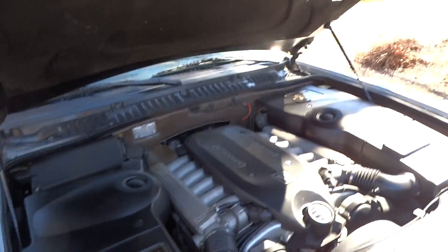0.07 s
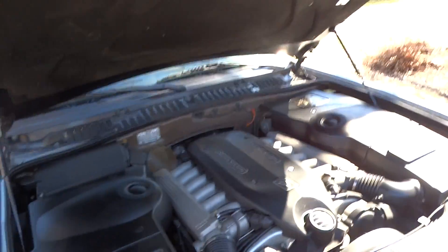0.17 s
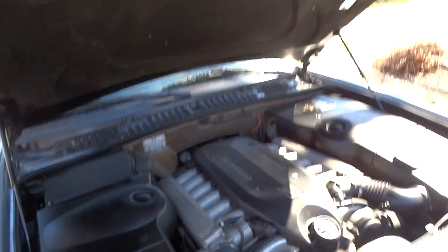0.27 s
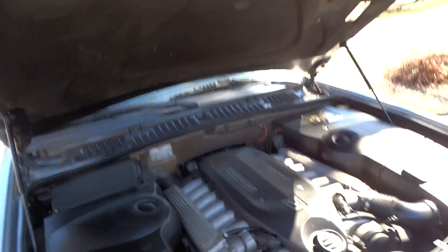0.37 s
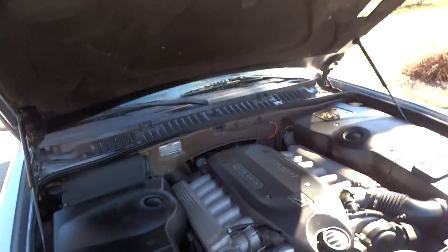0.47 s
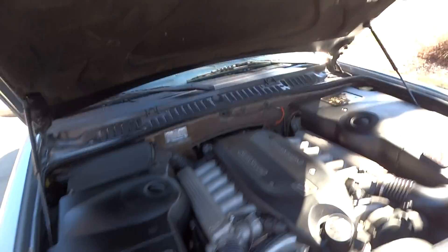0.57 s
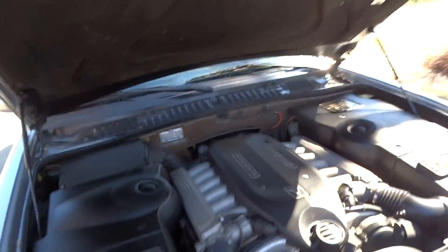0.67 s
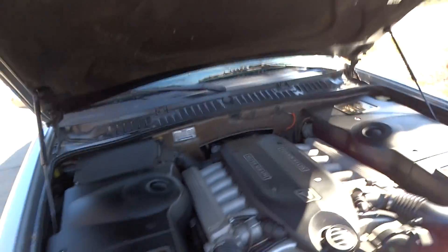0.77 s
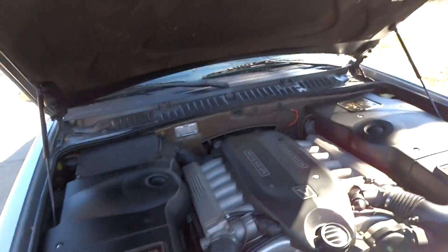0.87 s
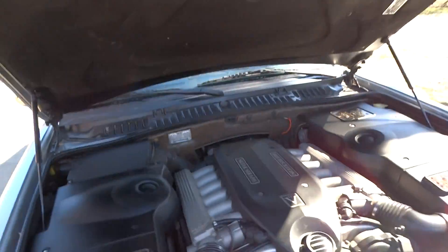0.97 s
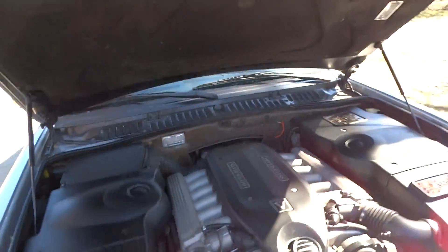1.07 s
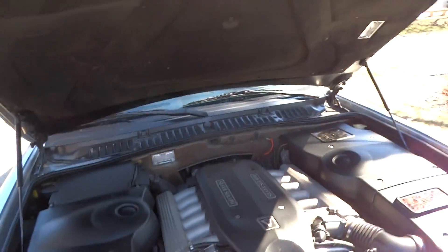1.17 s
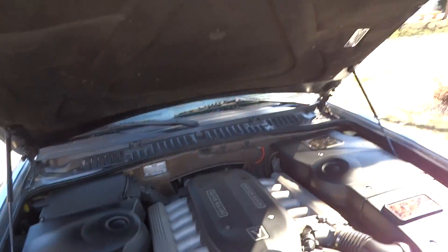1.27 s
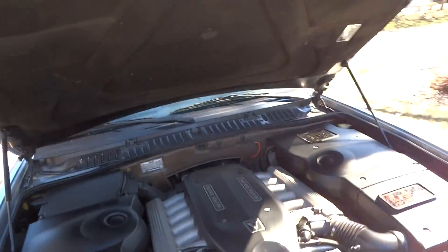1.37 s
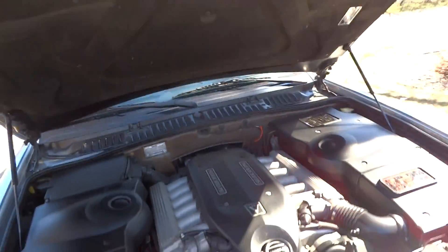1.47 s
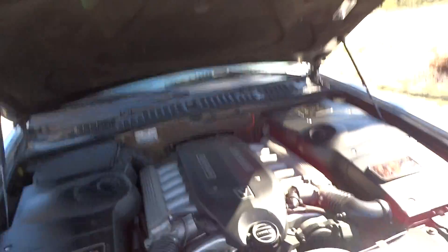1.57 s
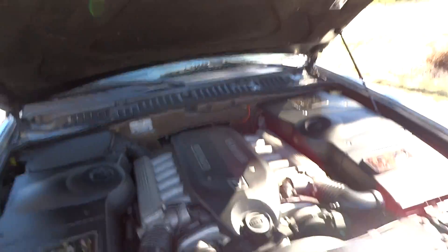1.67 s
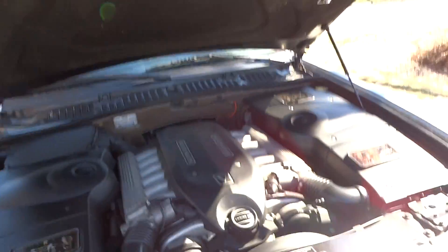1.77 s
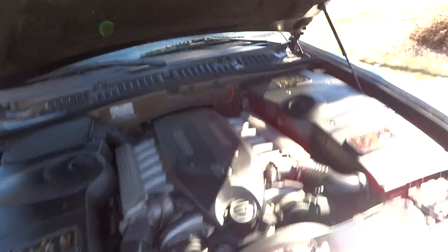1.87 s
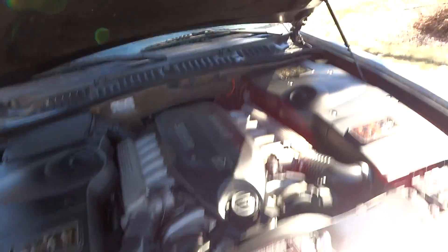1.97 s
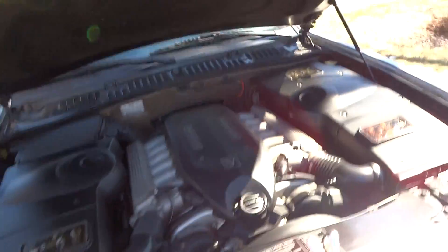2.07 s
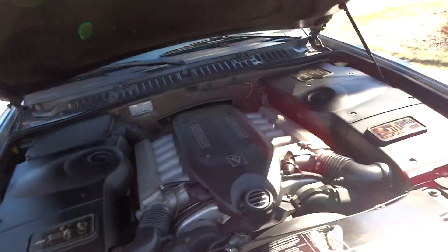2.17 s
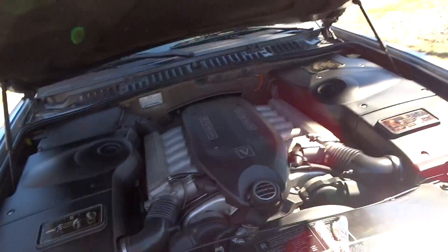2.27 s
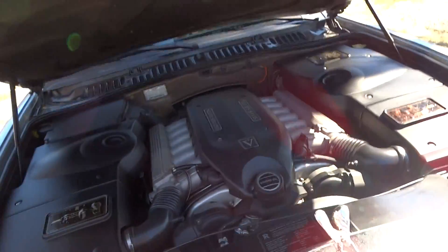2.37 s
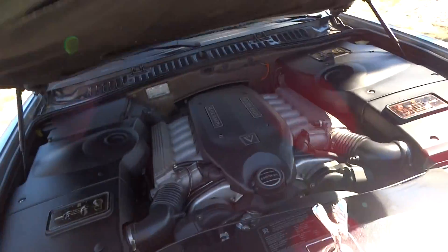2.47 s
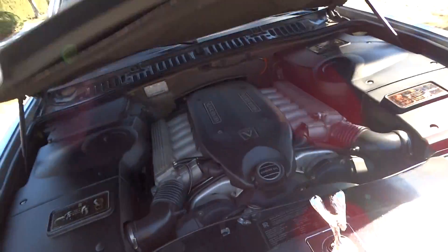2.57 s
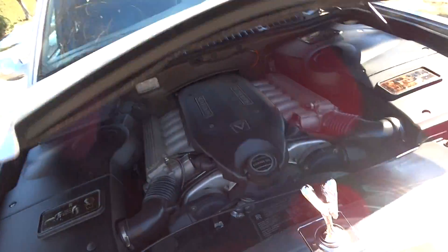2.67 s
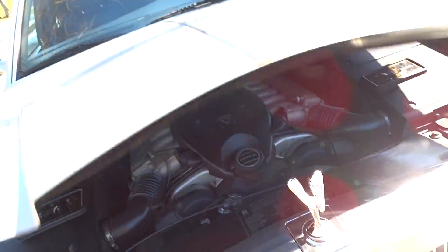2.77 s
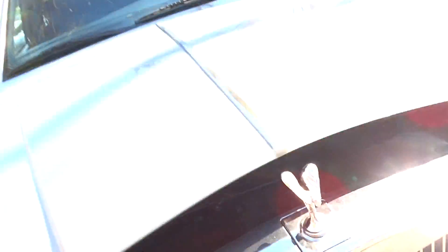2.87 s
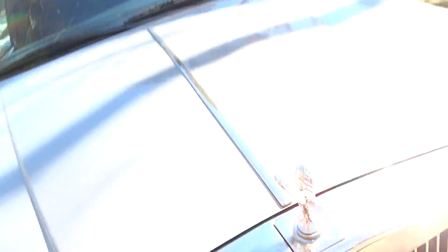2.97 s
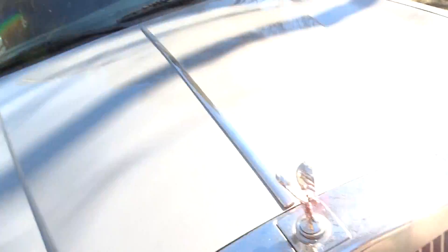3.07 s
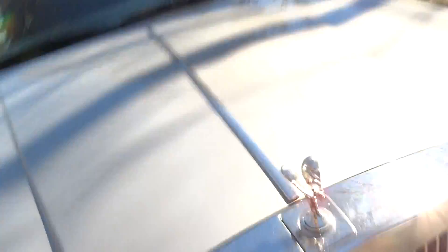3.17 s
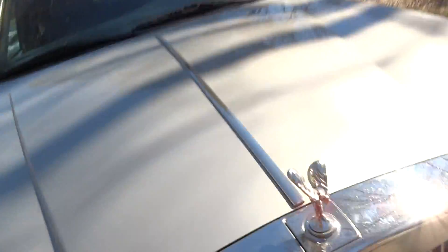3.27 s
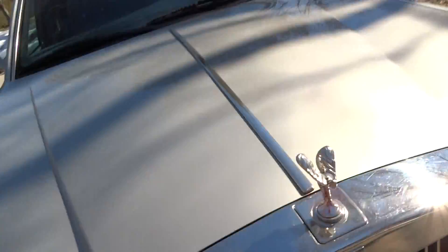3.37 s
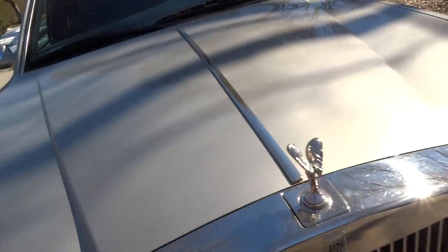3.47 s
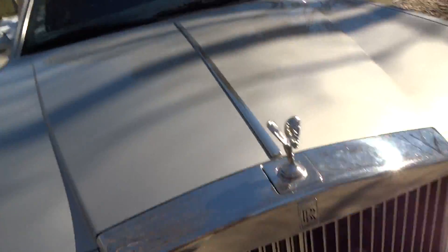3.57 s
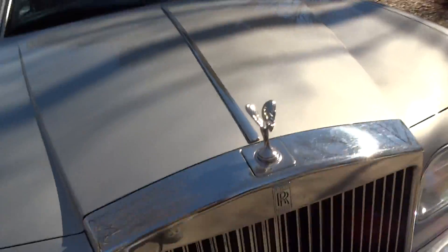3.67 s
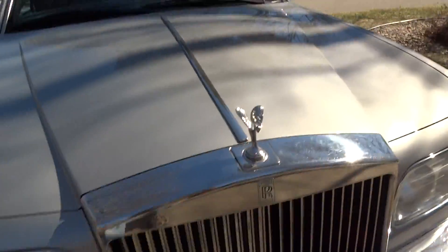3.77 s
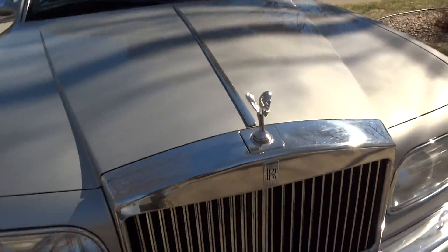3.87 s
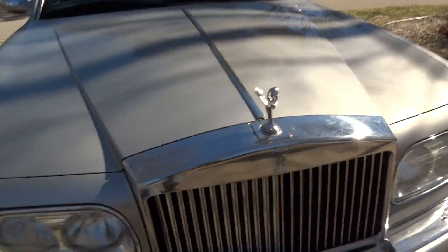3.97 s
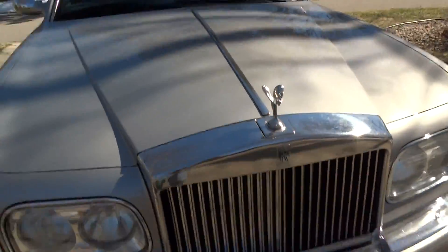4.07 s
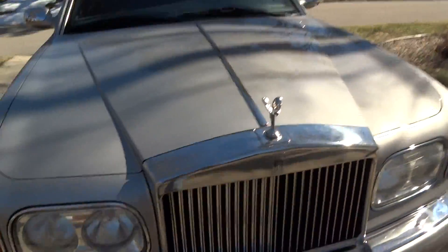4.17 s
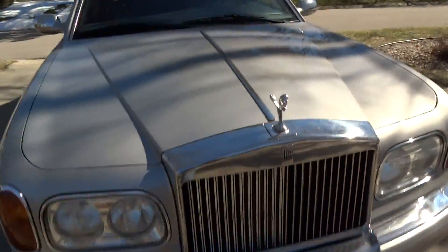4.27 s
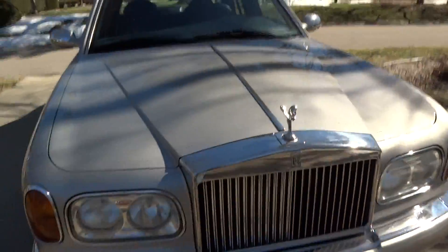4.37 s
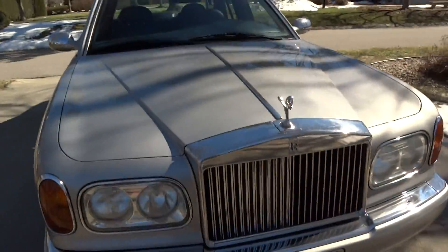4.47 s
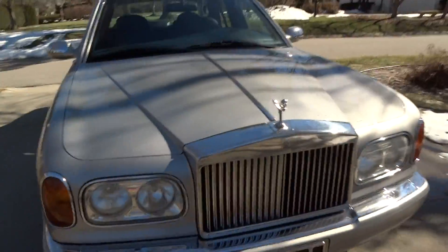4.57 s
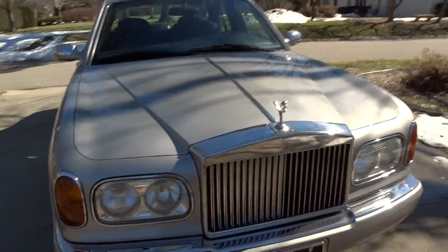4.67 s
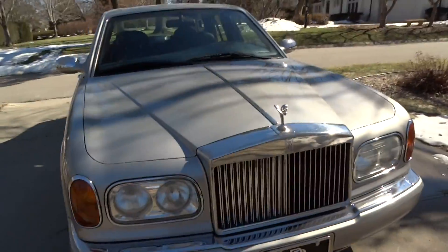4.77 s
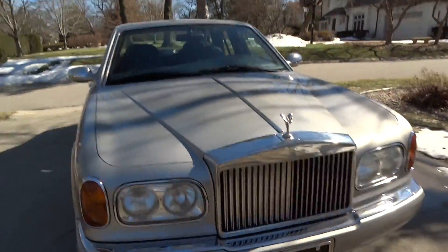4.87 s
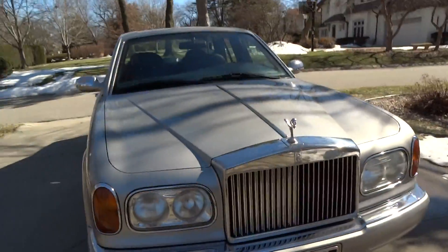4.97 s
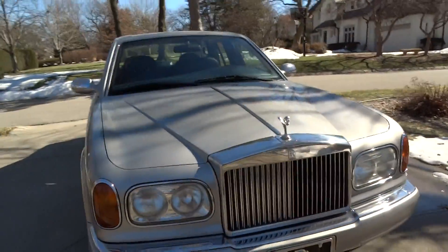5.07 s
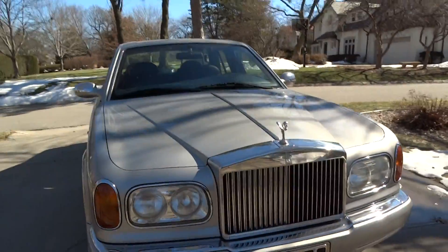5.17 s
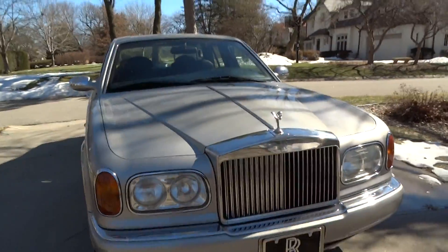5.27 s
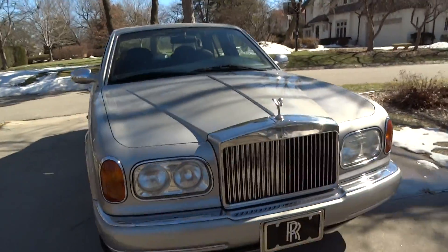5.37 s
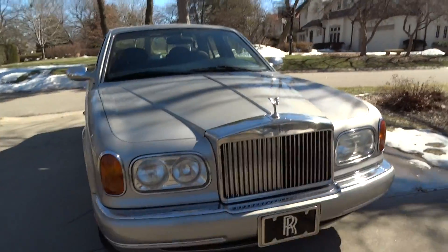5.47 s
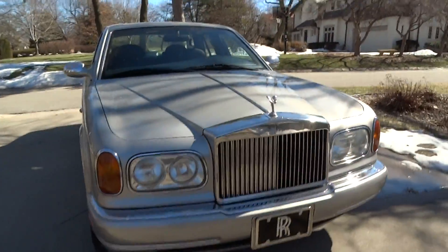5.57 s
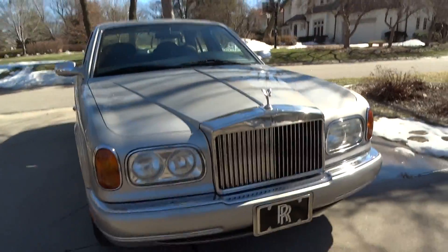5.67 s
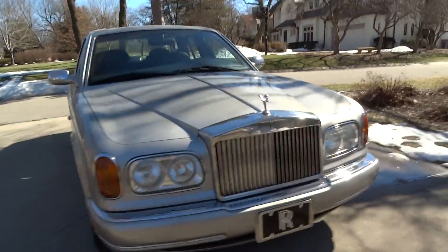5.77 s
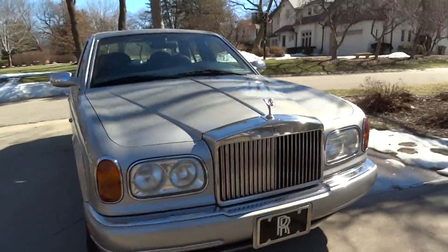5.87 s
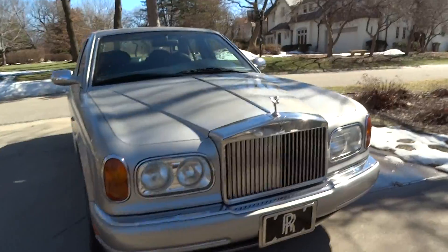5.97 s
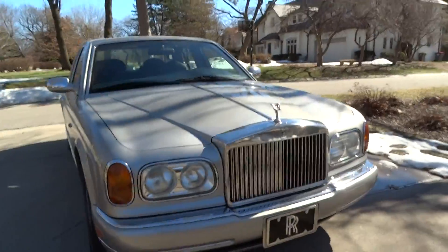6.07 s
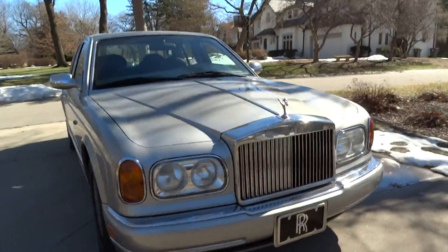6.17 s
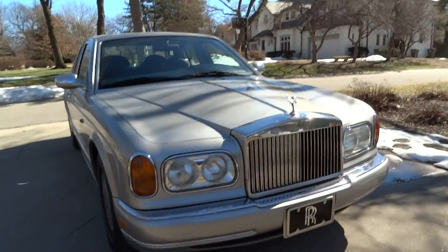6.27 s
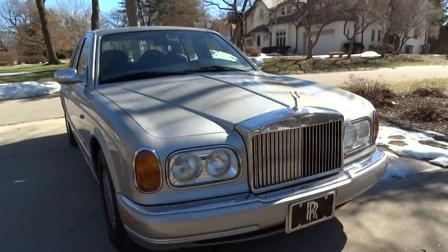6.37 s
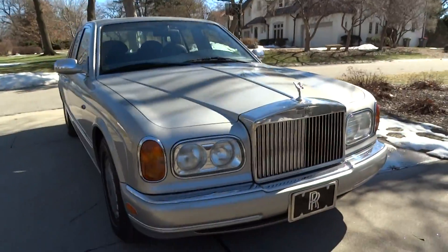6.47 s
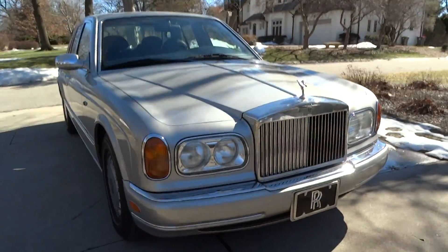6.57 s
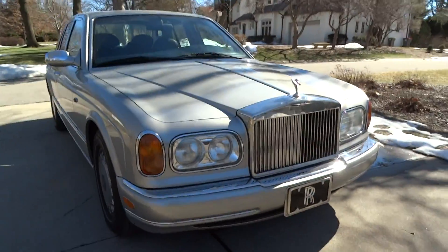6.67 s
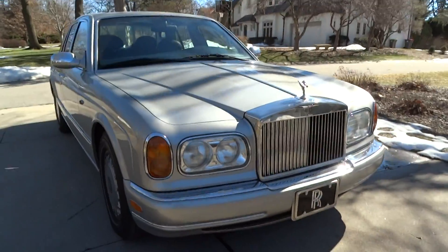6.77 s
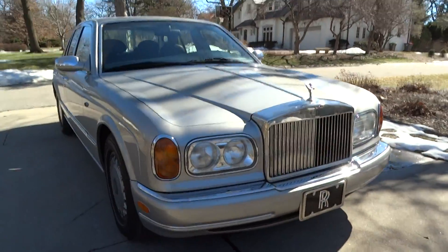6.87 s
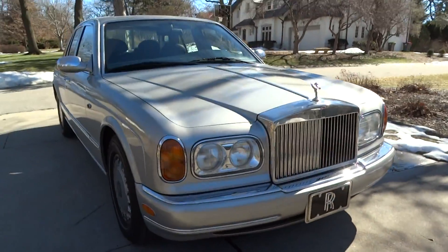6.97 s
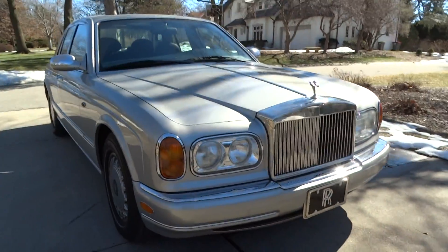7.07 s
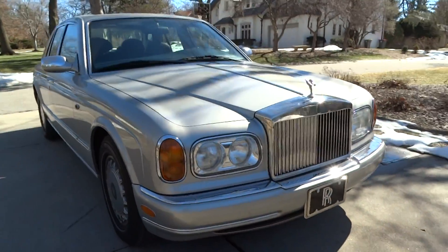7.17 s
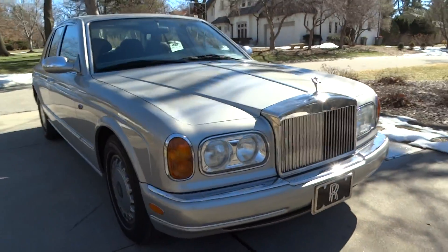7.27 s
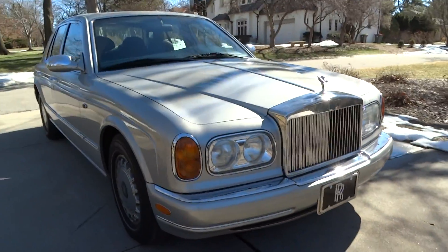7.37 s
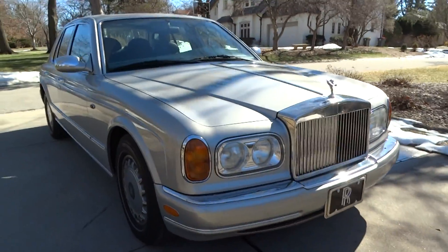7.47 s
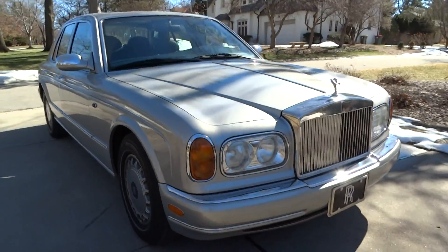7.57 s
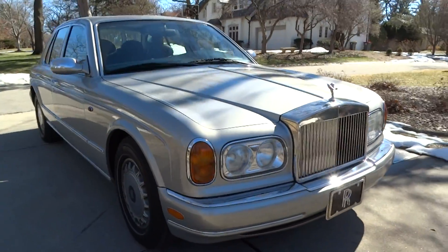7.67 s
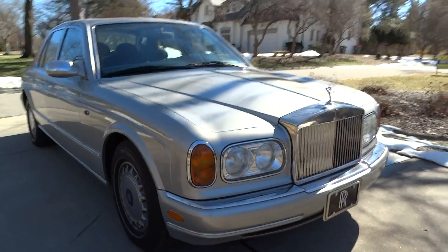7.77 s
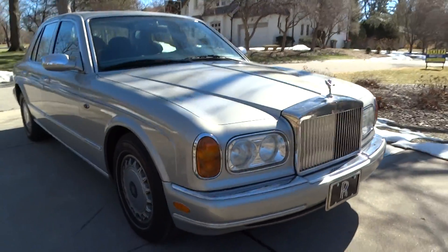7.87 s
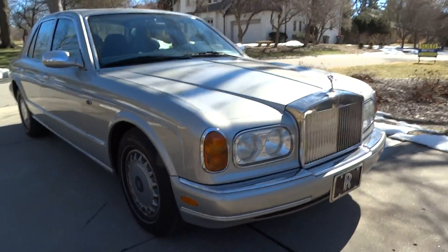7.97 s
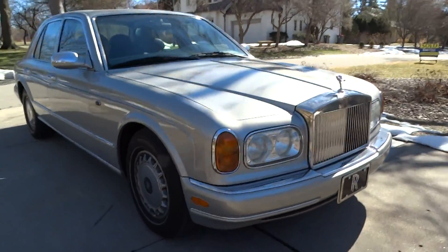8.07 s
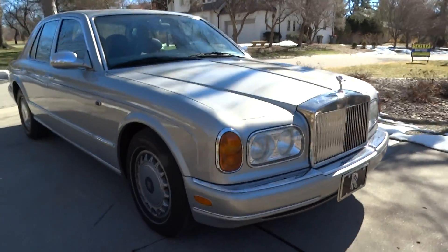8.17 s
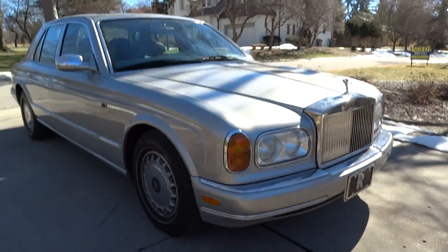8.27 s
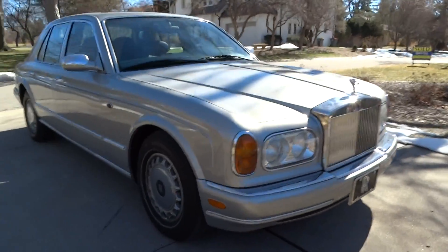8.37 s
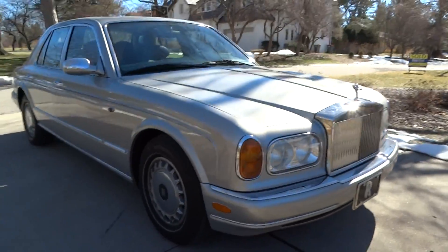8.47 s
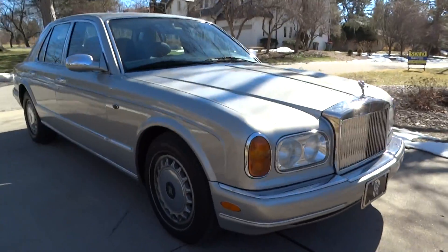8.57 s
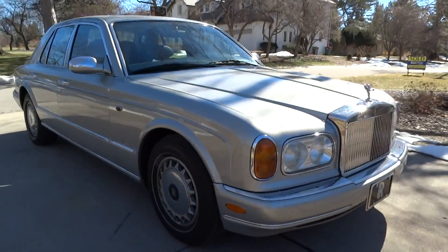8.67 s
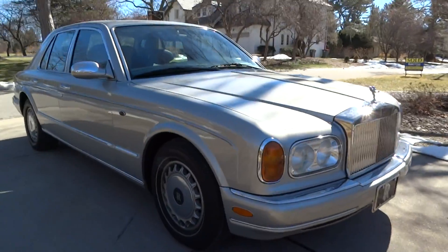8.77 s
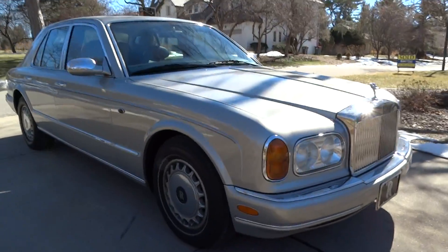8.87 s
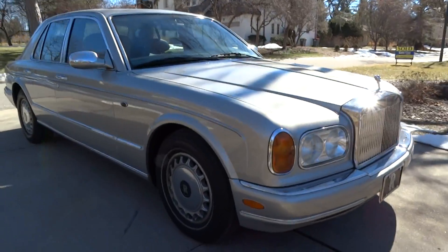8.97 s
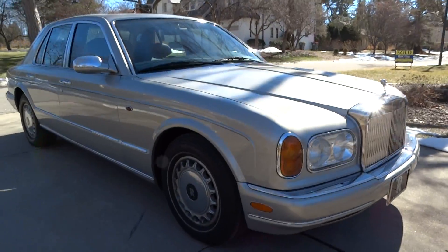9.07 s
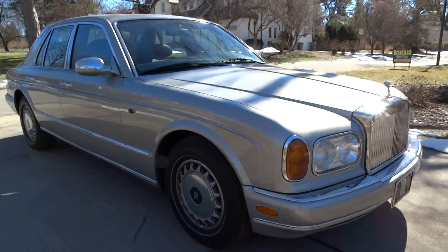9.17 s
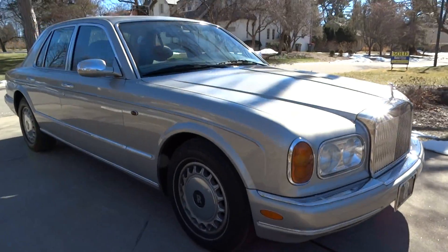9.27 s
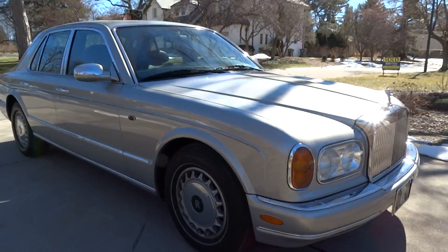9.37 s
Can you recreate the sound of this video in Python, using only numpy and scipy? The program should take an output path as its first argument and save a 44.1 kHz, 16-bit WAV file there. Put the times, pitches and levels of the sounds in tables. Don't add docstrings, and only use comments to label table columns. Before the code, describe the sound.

From 0 to 2.9 s a large engine idles steadily under an open bonnet, heard close outdoors: wide airy fan hiss, soft block roar, fast fine ticking, a hollow tone near 1.9 kHz and a faint whine around 930 Hz. Tiny footfalls and low wind puffs are barely noticeable. At 2.97 s the latch cracks and at 2.99 s the panel slams, very loud, with bright steel rattle, clang and a short mid-low boom, rubbery thumps and small clicks fading by about 3.5 s. The idle returns quieter, duller, with less ticking. From 3.7 to 5.6 s thin ice snaps in sparse, dry, bright clicks, the sharpest at 5.32 s. From 6.7 to 7.4 s a shoe drags and twists on grit, rasping and crunching. Small grit ticks follow near 8 s; a very faint distant vehicle hums through the end as the idle continues.

```python
import sys
import numpy as np
from scipy import signal
from scipy.fft import rfft, irfft, next_fast_len
from scipy.io import wavfile
from scipy.ndimage import uniform_filter1d, map_coordinates

SR = 44100
rng = np.random.default_rng(int(sys.argv[2]) if len(sys.argv) > 2 else 0)


def level_to_linear(level):
    exponent = np.asarray(level, float) / 20
    return 10 ** exponent


def transcribe(signal):
    frames = np.atleast_2d(signal).T
    limited = np.clip(frames, -1, 1)
    pcm = np.round(limited * 32767).astype(np.int16)
    wavfile.write(sys.argv[1], SR, pcm)


N = 414969

# time_s, pitch_hz, level_db
FAR_NOTE = [(7.9, 97.6, -91), (8.252, 105.8, -71), (8.34, 110, -76), (8.474, 113.6, -66), (8.534, 113, -75),
            (9.024, 116.1, -67), (9.244, 118.2, -76), (9.41, 116, -66)]
# peak_s, level_db
GUSTS = [(.64, -59), (.78, -53.5), (2.02, -57), (2.76, -62), (3.01, -47), (3.21, -52), (3.88, -64),
         (4.05, -68), (4.92, -62), (5.5, -71), (9.018, -63)]
# time_s, whine_hz, alternator_db
IDLE = [(0, 911, -56), (.5, 935, -64), (2.0, 925, -60), (2.36, 936, -48), (2.83, 954.6, -45),
        (2.95, 958, -49.5), (3.27, 942, -53.5), (3.58, 946, -50.5), (3.7, 927, -61), (4.142, 925, -52),
        (4.64, 930, -50.5), (4.78, 923, -70), (5.76, 924, -61), (6.7, 925, -69), (7.1, 918, -58.5),
        (8.3, 927, -58.5), (8.8, 952, -56.5), (9.41, 934, -59.5)]
# time_s, nearness_db
NEARNESS = [(0, -.5), (.84, 0), (1.5, 0), (2.1, .5), (3.6, 0), (3.93, 1), (4.32, 0), (4.51, 0), (5.1, -1),
            (6.2, -2), (7.6, -1.5), (8.1, -2), (9.0, -1.5), (9.41, -2)]
# open_db, shut_db, db_per_db_of_nearness, lost_to_bang_db
ENGINE_LAYERS = [
    (-47, -51.5, 1.93, -1.5),
    (-41, -46, 1.13, 3.5),
    (-49.5, -66, 0.5, 19),
]
# peak_s, level_db
HOLLOW_SWELLS = [(.0, -50), (.45, -47), (.9, -44.5), (2.1, -47.5), (2.7, -47), (4.5, -49), (5.4, -51),
                 (5.9, -49.5), (6.4, -51), (7.1, -49.5), (8.4, -53.5), (9.0, -56.5)]

# freq_hz, density_db
AIR_COLOUR = [(12, -55), (20, -34), (50, -16), (90, -6.5), (150, -7), (230, -6), (330, -12), (600, -120)]
OPEN_BLOCK_COLOUR = [(71, -52), (120, -22.5), (297, -8.5), (381, -2.5), (413, -7), (518, -3), (586, -9.5),
                     (711, -8.5), (787, -0.5), (1040, -6), (1330, -1), (1540, -9.5), (1800, -4),
                     (2340, -12.5), (3960, -120)]
SHUT_BLOCK_COLOUR = [(88, -38), (150, -18.5), (225, -19), (247, -18.5), (274, -9), (334, -13.5), (356, -14),
                     (386, -13), (562, -11.5), (767, -8), (869, -7), (935, -4.5), (1020, -8.5),
                     (1800, -13.5), (2340, -30), (3960, -120)]
FAN_COLOUR = [(760, -65), (1300, -4.5), (1860, -1.5), (2150, -0.5), (2470, -1.5), (2830, -4.5),
              (3380, -0.5), (3680, -1), (5150, 0), (6420, -5.5), (7830, -2.5), (9070, -10), (12600, -36),
              (15000, -55), (16000, -31.5)]
INJECTOR_COLOUR = [(1760, -7), (3000, -10), (3450, 0), (4030, -9), (5000, -4), (6570, -6.5), (8640, 1),
                   (9270, -2.5), (9940, -11), (11500, -5.5), (12500, -14), (14700, -13), (16000, -16)]
GRIT_COLOUR = [(350, -53), (600, -27), (1050, -4.5), (1140, -8), (1410, -5.5), (1980, -6.5), (2610, -3),
               (5050, -1), (6200, -11), (8620, -11.5), (16000, -41.5)]
RATTLE_COLOUR = [(1500, -29), (2500, -20), (3200, -3.5), (4400, -0.5), (6000, -2), (7700, -7), (8900, -6.5),
                 (10300, -20.5), (15100, -29), (16000, -36)]
CLANG_COLOUR = [(710, -34), (1200, -7.5), (1600, -7.5), (1750, -6), (2320, -10.5), (2900, -10.5),
                (3770, -10.5), (6380, -120)]
BOOM_COLOUR = [(24, -73), (40, -53), (162, -21.5), (242, -9), (298, -2), (341, -7), (487, -2), (618, -7.5),
               (738, -5), (832, -4.5), (937, -7.5), (1400, -15), (1820, -43), (3080, -120)]

# start_s, peak_db, pitch_hz
STEPS = [(0.759, -46, 380), (2.009, -44, 320), (3.859, -53, 195), (3.865, -43, 960), (4.06, -46, 600),
         (4.352, -38, 930), (4.43, -46.5, 562), (4.51, -50, 520), (7.073, -42, 1479), (9.008, -45.5, 312)]
# start_s, length_s, level_db, rasp_hz, brightness_db
SCUFFS = [(3.925, 0.054, -41, 4300, -15), (6.982, 0.047, -43.5, 4300, -4), (7.045, 0.042, -40.5, 5200, 0.5),
          (7.1, 0.078, -49, 4900, -2), (7.166, 0.032, -44, 4850, 5), (7.218, 0.19, -50.5, 5490, 2.5),
          (8.002, .13, -57, 4680, 5.5)]
# start_s, peak_db, pitch_hz
STONES = [(3.9303, -26, 4300), (3.939, -30, 4300), (6.7028, -35, 3680), (6.7178, -34, 5010),
          (6.7238, -34, 5060), (6.7485, -30, 4060), (6.761, -34, 3800), (6.788, -27, 3400),
          (6.8024, -31, 3320), (6.823, -30, 3300), (6.8438, -32, 3200), (6.8607, -25, 5150),
          (6.868, -29, 5100), (6.8925, -25, 3600), (6.9123, -24, 5100), (6.92, -28, 8800),
          (6.931, -27, 4000), (6.936, -21, 3300), (6.9435, -23, 5160), (6.9513, -30, 4390),
          (6.957, -31, 7600), (6.962, -27, 9000), (7.014, -33, 8590), (7.042, -28.5, 3700),
          (7.0495, -29, 8870), (7.056, -31, 4600), (7.0682, -23, 5150), (7.076, -28, 5200),
          (7.098, -34, 8500), (7.1265, -36, 3000), (7.134, -33, 8620), (7.164, -34, 5000),
          (7.172, -36, 9500), (7.1818, -30, 4500), (7.187, -27, 5000), (7.196, -26, 8300),
          (7.214, -34, 4000), (7.2513, -31.5, 5100), (7.272, -39, 9450), (7.333, -35, 5000),
          (7.3765, -30, 4850), (7.4182, -27, 4950), (7.429, -30, 5300), (8.006, -37, 5060),
          (8.0897, -36, 7850)]
# time_s, pressure_db, rasp_hz
DRAG = [(6.7, -59, 4500), (6.72, -43.5, 4320), (6.752, -36, 3920), (6.772, -35.5, 3700), (6.79, -33, 3450),
        (6.815, -36, 3285), (6.845, -35, 3250), (6.862, -41, 3290), (6.886, -51, 3400)]
# time_s, pressure_db, rasp_hz
TWIST = [(6.889, -48, 4000), (6.894, -39.5, 4200), (6.914, -34, 4600), (6.927, -39, 4000),
         (6.94, -37, 4200), (6.952, -34, 4600), (6.965, -31.5, 6000), (6.976, -43, 5800), (6.99, -52, 5600)]
# rasp_db, grit_db, bright_grit_db, sole_whistle_db
STROKE_MIXES = [
    (1, -5.5, -15, -9),
    (-5, 0, -4.5, -10),
]

# start_s, peak_db, snap_hz, low_shard_db, knock_db
DEEP_SNAPS = [(3.664, -36, 3600, -1, -0.5), (4.324, -27, 4850, -3, -26), (4.8052, -19.5, 4150, -17, -20),
              (4.9593, -26.5, 3900, -0.5, -7.5), (5.3223, -6, 4180, -22, -26.5)]
# start_s, peak_db, snap_hz, low_shard_db, knock_db
SHALLOW_SNAPS = [(3.7662, -21, 3860, -18, -22), (3.7678, -25, 5000, -12, -22),
                 (4.352, -30.5, 4250, -16, -4), (4.731, -24.5, 4550, -13, -11), (4.9482, -33, 3200, -6, -9),
                 (4.9995, -29.5, 4570, -5, -10), (5.627, -18.5, 4520, -14, -21.5)]
# pitch_ratio, level_db
SHARD_OVERTONES = [(1.9, -22), (3.0, -17)]
# centre_hz, width_hz, level_db
CRUST_MODES = [(2270, 1500, 0.5), (3700, 1700, 4), (8300, 1800, -1), (13000, 1800, -11)]

# start_s, peak_db, ring_hz
LATCH = [(2.969, -2, 7900), (2.983, -15, 4500), (2.9941, -5, 5700), (3.0024, -15, 3900), (3.0123, -9, 6500),
         (3.022, -11, 4630), (3.0594, -15, 4270), (3.1227, -21, 3330), (3.172, -29, 7340),
         (3.195, -33, 3420), (3.2228, -29, 3360), (3.2424, -35, 3390), (3.286, -35, 4500)]
# start_s, peak_db, pitch_hz
RUBBER_STOPS = [(2.969, -23, 1700), (2.976, -23, 330), (2.98, -25, 1320), (2.983, -25, 754),
                (3.019, -12, 700), (3.024, -14.5, 398), (3.026, -15, 1214), (3.03, -17.5, 990),
                (3.042, -14.5, 770), (3.05, -21, 302), (3.056, -15.5, 695), (3.064, -13, 498),
                (3.072, -16, 790), (3.085, -16, 640.5), (3.09, -19, 520), (3.118, -23, 380),
                (3.12, -25, 830), (3.215, -35, 800)]
# pitch_hz, level_db, t60_s
PANEL_MODES = [(225, -31.5, 0.67), (325, -40, 2.0), (424, -24.5, 0.54), (520, -28, 0.39), (754, -31, 0.49),
               (860, -46, 1.4), (1090, -30, .28), (1227, -29.5, 0.62), (1300, -37, 1.0), (1960, -41, 0.67),
               (3100, -46, .7), (3400, -31, 0.6), (3898, -36, 0.56), (5240, -40, 0.33)]
# strike_db, blow_db, attack_s, lose_20_db_s, tail_db, tail_t60_s
SHAKES = [
    (-15.5, -14, 0.0021, 0.1445, -38, 0.49),
    (-19.5, -19, 0.013, 0.193, -43, 0.48),
    (-28, -20, 0.0052, 0.17, -28.5, 0.86),
]
# freq_hz, side_db
PORT_SIDE = [(40, -16), (250, -15), (800, -11.5), (1400, -12.5), (2400, -17), (3600, -22.5), (4500, -31),
             (7400, -33.5), (8400, -16), (10800, -8), (13000, -16), (15500, -29)]

STRIKE_S, BLOW_S = 2.968, 2.993


def unit(x):
    return x / np.sqrt(np.mean(x ** 2) + 1e-20)


def along(points, hz):
    f, v = np.transpose(points)
    return np.interp(np.log(hz + 1), np.log(f + 1), v)


def curves(rows, outside=None):
    s, *columns = np.transpose(rows)
    t = np.arange(N) / SR
    return [np.interp(t, s, column, outside, outside) for column in columns]


def peaks(rows, rise, fall):
    t = np.arange(N) / SR
    return np.max([db - np.maximum(rise * (s - t), fall * (t - s)) for s, db in rows], axis=0)


def wobble(rate):
    knots = rng.standard_normal(int(N * rate / SR) + 4)
    return map_coordinates(knots, [np.arange(N) * rate / SR])


def filtered(x, response):
    m = next_fast_len(N + SR // 2)
    return irfft(rfft(x, m) * response(np.fft.rfftfreq(m, 1 / SR)), m)[..., :N]


def narrow(width_hz):
    return unit(filtered(rng.standard_normal(N), lambda hz: 1 / (1 + (hz / width_hz) ** 4)))


def rush(colour, patchy_db):
    z = signal.stft(rng.standard_normal(N + 512), nperseg=512)[2]
    field = uniform_filter1d(rng.standard_normal(z.shape), size=5, axis=0)
    field = uniform_filter1d(field, size=16, axis=1)
    x = signal.istft(z * level_to_linear(patchy_db * unit(field)), nperseg=512)[1][:N]
    lowest_hz = colour[0][0]
    return unit(filtered(x, lambda hz: level_to_linear(along(colour, hz)) * np.minimum(hz / lowest_hz, 1) ** 4))


def tone(hz, phase=0):
    return np.sin(2 * np.pi * np.cumsum(np.broadcast_to(hz, N)) / SR + phase)


def decay(db, t60, length=SR // 20):
    return level_to_linear(db - 60 * np.arange(length) / SR / t60)


def ring(hz, t60, attack, length=SR // 8):
    t = np.arange(length) / SR
    return np.sin(2 * np.pi * hz * t) * decay(0, t60, length) * (1 - np.exp(-t / attack))


def add(track, s, sound):
    part = track[round(s * SR):][:len(sound)]
    part += sound[:len(part)]


def surroundings():
    calm_db = -75
    air_db = np.maximum(peaks(GUSTS, rise=198, fall=140.5), calm_db)
    air = level_to_linear(air_db) * unit(level_to_linear(3.2 * wobble(11)) * rush(AIR_COLOUR, patchy_db=0.0))
    far_db = curves(FAR_NOTE, -120)[1] + 2.5 + 1.54 * wobble(8)
    return air + level_to_linear(far_db) * tone(curves(FAR_NOTE)[0])


def bay_hollow():
    t = np.arange(N) / SR
    open_hz, grille_hz, sink_hz_per_s = 1854, 2182, 31
    hz = np.where(t > BLOW_S, grille_hz - sink_hz_per_s * np.maximum(t - 5.5, 0), open_hz)
    level_db = peaks(HOLLOW_SWELLS, rise=19, fall=19) - 1.5
    return level_to_linear(level_db) * (.45 + .85 * narrow(95)) * tone(hz)


def belt_whines(turns, alternator_db):
    t = np.arange(N) / SR
    pump_db = -68.5 + 11 * np.exp(-((t - 3.75) / 1.1) ** 4)
    out = np.zeros(N)
    for cycles_per_firing, db in ((15, alternator_db), (18, pump_db)):
        phase = 2 * np.pi * cycles_per_firing * turns + 0.4 * wobble(25)
        out += level_to_linear(db + 1 + 1.5 * wobble(16)) * np.sin(phase)
    pulley_db = np.where(t > 6.8, -60.5, -69.5)
    out += level_to_linear(pulley_db) * (.6 + .75 * narrow(35)) * tone(778)
    lean_in = np.exp(-((t - 1.95) / .55) ** 2)
    return out + level_to_linear(-62) * lean_in * tone(520, .6 * wobble(20))


def injectors(turns):
    size_db = 3.0 * rng.standard_normal(int(N / SR * 70))[turns.astype(int)]
    puff = 0.77 + level_to_linear(size_db) * (.5 - .5 * np.cos(2 * np.pi * turns)) ** 0.96
    return unit(puff * rush(INJECTOR_COLOUR, patchy_db=1.8))


def engine():
    t = np.arange(N) / SR
    shut_s, fall_s, deaf_s, recover_s = 2.97, .17, 0.29, 0.26
    cover = np.clip((t - shut_s) / fall_s + 1, 0, 1)
    deaf = (t > BLOW_S) * np.exp(-np.maximum(t - BLOW_S - deaf_s, 0) / recover_s)
    near_db, = curves(NEARNESS)
    levels = []
    for open_db, shut_db, grows, lost_db in ENGINE_LAYERS:
        cover_db = (shut_db - open_db) * cover ** 1.15
        levels.append(open_db + cover_db + grows * near_db - lost_db * deaf)
    block_db, fan_db, injector_db = levels
    whine_hz, alternator_db = curves(IDLE)
    turns = np.cumsum(whine_hz / 15) / SR
    block = np.sqrt(1 - cover) * rush(OPEN_BLOCK_COLOUR, patchy_db=1.0)
    block += np.sqrt(cover) * rush(SHUT_BLOCK_COLOUR, patchy_db=2.5)
    out = level_to_linear(block_db - 1.6) * block
    out += level_to_linear(fan_db - 0.68) * rush(FAN_COLOUR, patchy_db=0.6)
    out += level_to_linear(injector_db + 7.5) * injectors(turns)
    return out + belt_whines(turns, alternator_db) + bay_hollow()


def feet():
    out, crunch = np.zeros(N), np.zeros(N)
    grit = rush(GRIT_COLOUR, patchy_db=2.1)
    bright = unit(filtered(grit, lambda hz: 1 / (1 + (7000 / (hz + 1)) ** 8)))
    grains = unit(level_to_linear(1.9 * wobble(110) + 1.7 * wobble(600)))
    fuzz = narrow(470)
    whistle = narrow(262) * tone(5100)
    for stroke, (rasp_db, grit_db, bright_db, sole_db) in zip((DRAG, TWIST), STROKE_MIXES):
        pressure = level_to_linear(curves(stroke, -120)[0])
        blend = level_to_linear(rasp_db) * fuzz * tone(curves(stroke)[1]) + level_to_linear(grit_db) * grit
        blend += level_to_linear(bright_db) * bright + level_to_linear(sole_db) * whistle
        out += pressure * grains * blend
    attack_s, release_s, sag_db, sag_hz_per_s = 0.012, 0.014, 1.5, 5000
    for s, length, db, hz, bright_db in SCUFFS:
        t = np.maximum(np.arange(N) / SR - s, 0)
        drag = np.minimum(t / attack_s, 1) * level_to_linear(-sag_db * np.minimum(t / length, 1))
        drag *= np.exp(-np.maximum(t - length, 0) / release_s)
        rasp = fuzz * np.sin(2 * np.pi * (hz - sag_hz_per_s * t / 2) * t)
        out += level_to_linear(db) * drag * grains * (0.6375 * rasp + 0.5 * grit + level_to_linear(bright_db - 5.0) * bright)
    for s, db, hz in STONES:
        add(crunch, s, decay(db - 15, 0.014))
        add(out, s, level_to_linear(db + 7) * ring(hz, 0.0035, 0.00013))
    for s, db, hz in STEPS:
        add(out, s, level_to_linear(db + 7.0) * ring(hz, 0.046, 0.0039))
    return out + crunch * grit


def resonances(modes):
    def response(f):
        total = 0
        for k, (centre, width, db) in enumerate(modes):
            total = total + (-1) ** k * level_to_linear(db) * 1j * f * width / (centre ** 2 - f * f + 1j * f * width)
        return total
    return response


def ice():
    breaks, out, t = np.zeros(N), np.zeros(N), np.arange(SR // 20) / SR
    attack_s, fade_s, start_ratio, rises_per_s = 0.00019, 0.0019, 0.84, 164
    flick = (1 - np.exp(-t / attack_s)) * level_to_linear(-20 * (t / fade_s) ** 2)
    for hollow_hz, snaps in ((930, DEEP_SNAPS), (1360, SHALLOW_SNAPS)):
        for s, db, hz, shard_db, knock_db in snaps:
            breaks[round((s + .0003) * SR)] += level_to_linear(db + 10)
            add(breaks, s + 0.00074, decay(db - 9, 0.022) * rng.standard_normal(len(t)))
            phase = 2 * np.pi * hz * t * (start_ratio + rises_per_s * t / 2)
            shard = np.sin(phase)
            for ratio, level_db in SHARD_OVERTONES:
                shard += level_to_linear(level_db) * np.sin(ratio * phase)
            add(out, s, level_to_linear(db + 5.5) * flick * shard)
            add(out, s + 0.00073, level_to_linear(db + shard_db + 1.0) * ring(.46 * hz, 0.023, 0.00038))
            add(out, s + 0.00157, level_to_linear(db + knock_db + 6.0) * ring(hollow_hz, 0.023, 0.00042))
    return out + filtered(breaks, resonances(CRUST_MODES))


def shake(strike_db, blow_db, attack, fade, tail_db, tail_t60, late_s=0):
    t = np.arange(N) / SR
    early = np.maximum(t - STRIKE_S, 0)
    late = np.maximum(t - BLOW_S - late_s, 0)
    strike = level_to_linear(strike_db) * (1 - np.exp(-early / 0.013)) * np.exp(-late / 0.0079)
    blow = level_to_linear(blow_db - 20 * (late / fade) ** 2) + level_to_linear(tail_db - 60 * late / tail_t60)
    return strike + (1 - np.exp(-late / attack)) ** 3 * blow


def latch_and_stops(steel):
    bursts, rings = np.zeros(N), np.zeros(N)
    latch_t60 = 0.049
    for s, db, hz in LATCH:
        add(bursts, s, decay(db - 19.5, latch_t60, SR // 8))
        add(bursts, s, decay(db - 15.5, 0.017))
        add(rings, s, level_to_linear(db - 2.5) * ring(hz, 0.23 * latch_t60, 0.00029))
    for s, db, hz in RUBBER_STOPS:
        add(rings, s, level_to_linear(db) * ring(hz, 0.076, 0.0022))
    return steel * bursts, rings


def panel_ring():
    out, flutter = np.zeros(N), wobble(13)
    for k, (hz, db, t60) in enumerate(PANEL_MODES):
        level = level_to_linear(db + 2 + 1.5 * flutter[k * SR // 2:][:SR])
        add(out, 3.015, level * ring(hz, t60, 0.056, length=SR))
    return out


def bonnet():
    rattling, clanging = shake(*SHAKES[0]), shake(*SHAKES[1])
    booming = shake(*SHAKES[2], late_s=0.014)
    steel = rush(RATTLE_COLOUR, patchy_db=-1.5)
    cracks, rings = latch_and_stops(steel)
    rattle = steel * rattling * level_to_linear(-3.5 + 2.1 * wobble(170)) + cracks
    clang = clanging * level_to_linear(1.4 * wobble(120)) * rush(CLANG_COLOUR, patchy_db=-0.5)
    boom = booming * level_to_linear(1.2 * wobble(70)) * rush(BOOM_COLOUR, patchy_db=-0.3)
    contact = 1 - .85 * np.exp(-((np.arange(N) / SR - 2.9918) / .0012) ** 4)
    return contact * (rattle + clang + boom) + rings + panel_ring()


def ports(x, t60):
    scatter = rng.standard_normal(SR // 2) * decay(0, t60, SR // 2)
    late = signal.fftconvolve(x, scatter / np.linalg.norm(scatter))[:N]

    def side_response(hz):
        lead = 0.93 / (1 + (hz / 2600) ** 4)
        return level_to_linear(along(PORT_SIDE, hz)) * np.array([1j * lead, np.sqrt(1 - lead ** 2)])

    side = filtered(np.array([x, late]), side_response).sum(axis=0)
    return np.array([x + side, x - side])


def scene():
    steady = surroundings() + engine()
    ground = feet() + filtered(ice(), lambda hz: 1 / (1 + 1j * hz / 8000) ** 3)
    ground = filtered(ground, lambda hz: (1j * hz / (170 + 1j * hz)) ** 3)
    return ports(steady, t60=0.39) + ports(ground, t60=0.034) + ports(bonnet(), t60=0.053)


def low_pass(x):
    return signal.sosfilt(signal.butter(12, 16470, fs=SR, output="sos"), x)


def record(dry):
    squeezed = dry / (1 + np.abs(dry / 0.76) ** 4) ** (1 / 4)
    mix = filtered(squeezed, lambda hz: (hz < 15900) * 1j * hz / (22 + 1j * hz))
    return low_pass(mix)


dry = scene()
out = record(dry)
transcribe(out)
```